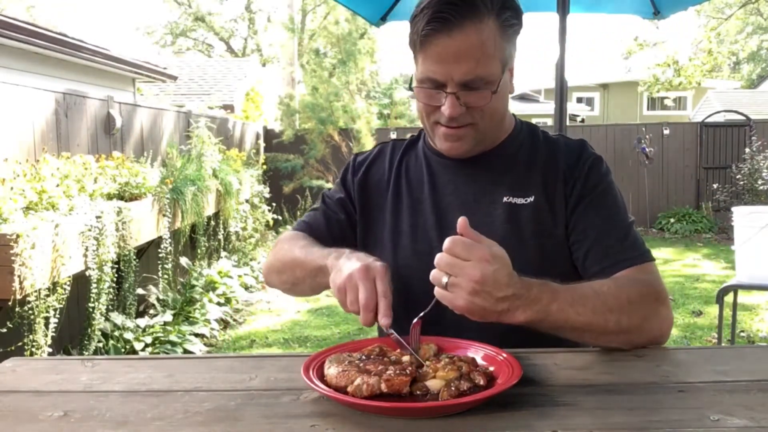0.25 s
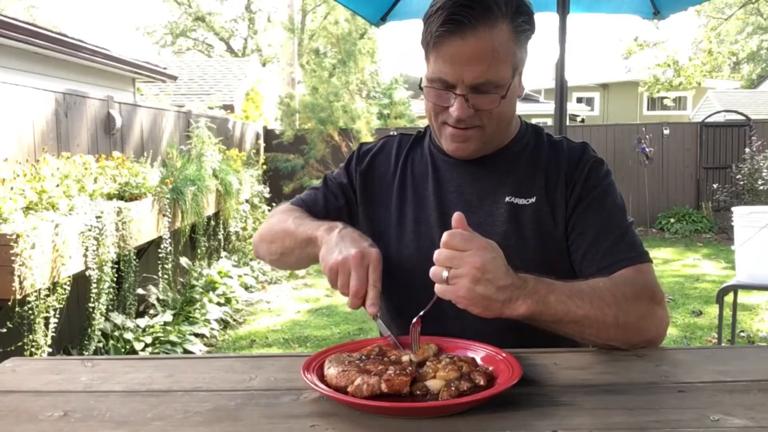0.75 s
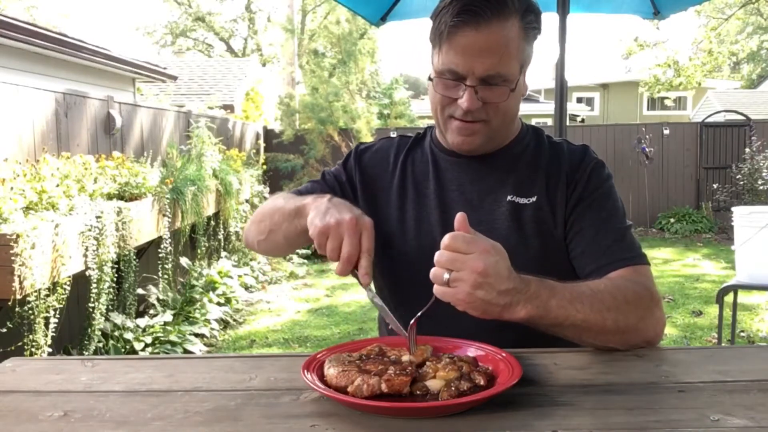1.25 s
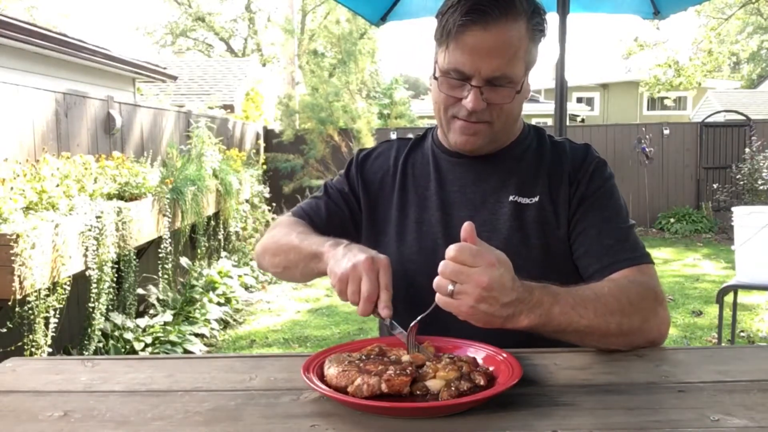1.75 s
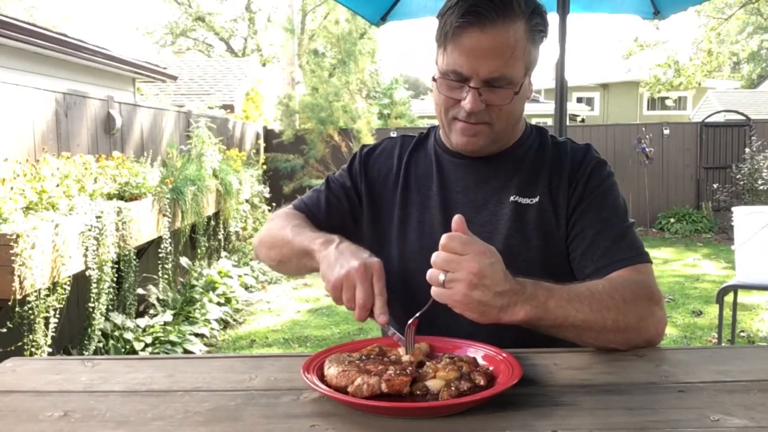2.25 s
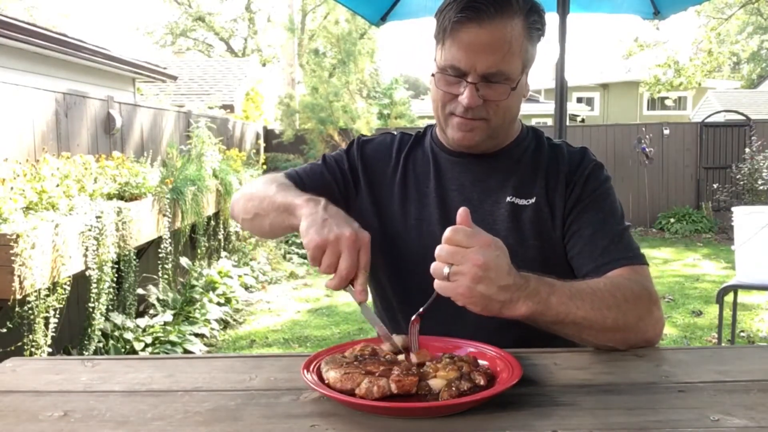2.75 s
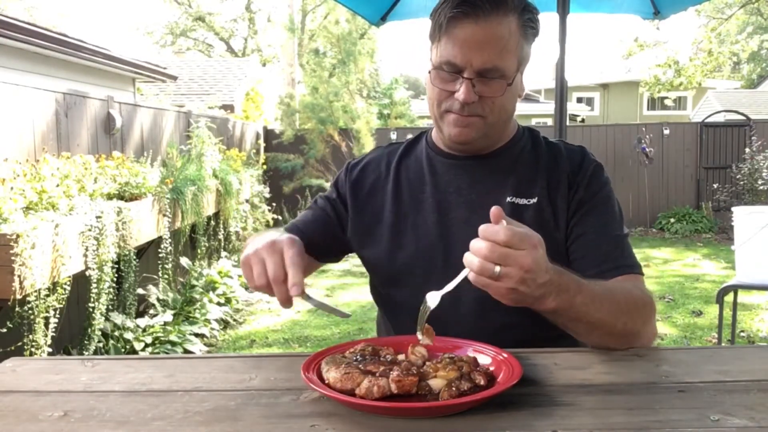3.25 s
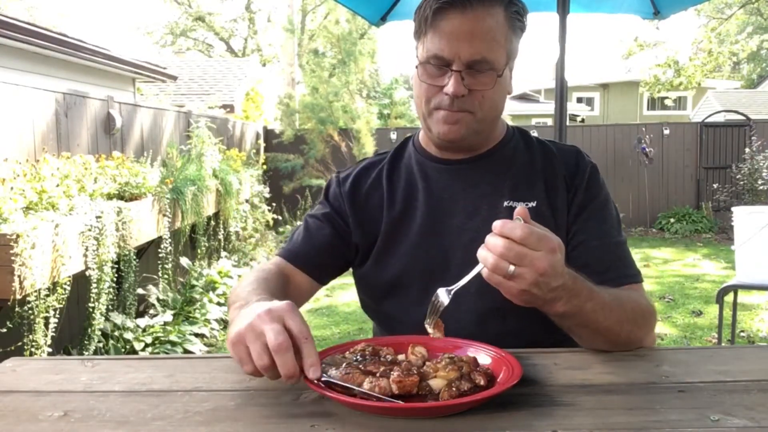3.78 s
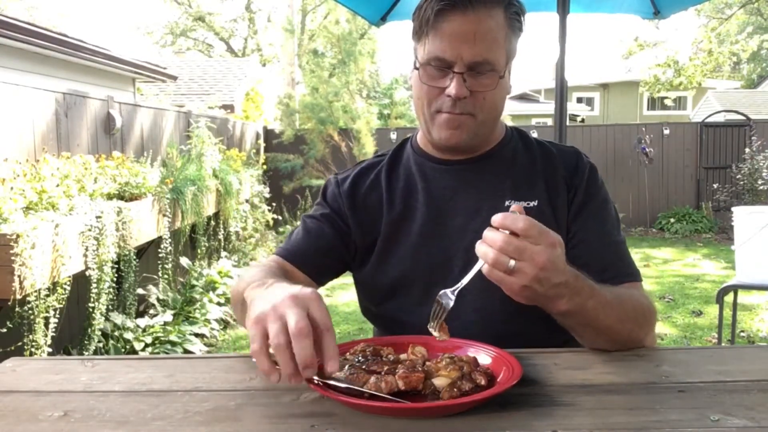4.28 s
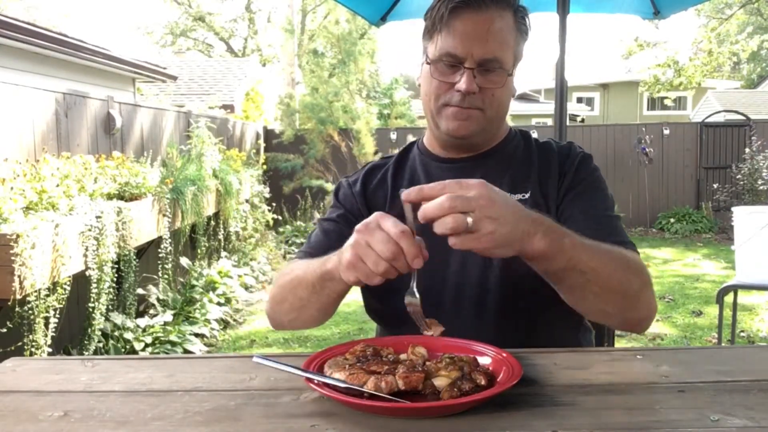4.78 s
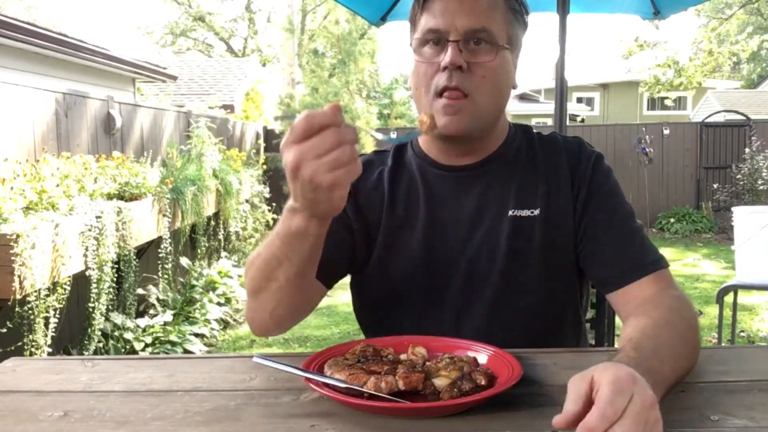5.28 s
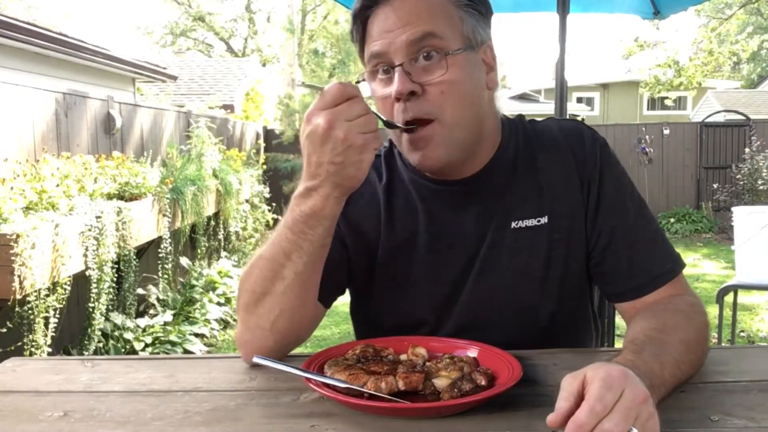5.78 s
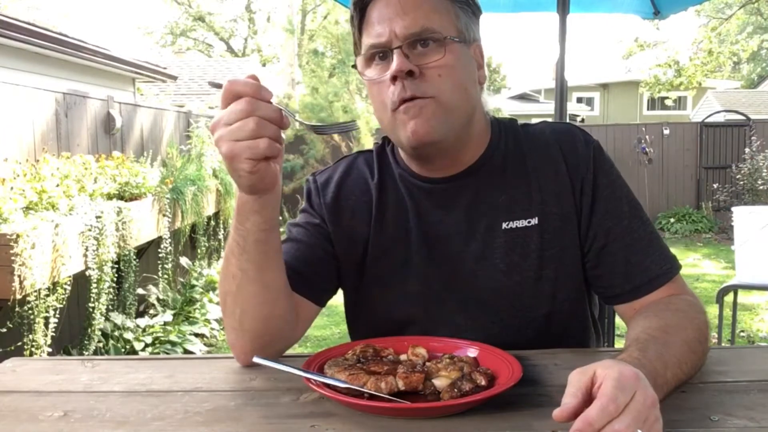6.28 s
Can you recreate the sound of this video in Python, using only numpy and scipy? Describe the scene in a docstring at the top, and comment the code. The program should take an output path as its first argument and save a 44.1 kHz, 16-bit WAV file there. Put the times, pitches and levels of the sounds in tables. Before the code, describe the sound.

A steel knife and fork work on a glazed plate on a wooden garden table, about a metre away, over a steady low town hum and very faint insect hiss. The fork ticks dully and the blade rasps softly through meat. A sharp clink rings the plate at 0.5 seconds, followed by a juddering scrape from 0.8 to 1 second. Small ticks and a tiny squeak come around 1.5 seconds. Another clink lands at 2.1, then a chattering scrape leads to a short, falling squeak at 2.6. From 3.5 to 4.3 seconds the knife is laid on the rim and nudged, with several clinks and light wooden knocks. Hands brush the wood faintly near 4.4 and 5.1 seconds, with a soft knock and two faint ticks. From about 6.1 seconds, far brakes give a thin, high squeal.

```python
"""A steel knife and fork work on a glazed plate on a wooden garden table, a metre away.
Blows and stick-slip judder ring the plate, the steel and the planks; the edge squeaks on the glaze.
The blade saws through meat, the fork ticks, hands brush the wood, the knife is laid on the rim.
Behind it: a low town hum, thin insect hiss and, at the end, a far squeal of brakes."""
import sys
import numpy as np
from scipy import signal
from scipy.fft import rfft, irfft
from scipy.io import wavfile
from scipy.ndimage import uniform_filter1d

SR = 44100
rng = np.random.default_rng(int(sys.argv[2]) if len(sys.argv) > 2 else 0)


def int16_out(signal):
    """Quantize to a 16-bit WAV file."""
    q = np.round(np.clip(np.atleast_2d(signal).T, -1, 1) * 32767)
    wavfile.write(sys.argv[1], SR, q.astype(np.int16))


N = 287973
TIME_S = np.arange(N) / SR
SILENT_DB = -120.0
GRIP_BELOW_HZ = 4000  # the hand damps bending modes below this


def undb(db):
    return 10 ** (np.asarray(db) / 20)


def unit_rms(x):
    return x / np.sqrt(np.mean(x ** 2))


def band(x, lo_hz, hi_hz):
    return signal.sosfilt(signal.butter(2, [lo_hz, hi_hz], "band", fs=SR, output="sos"), x)


def curve(segments, rest=SILENT_DB):
    """Lines through each segment's (time_s, value) points; rest elsewhere."""
    out = np.full(N, rest)
    for points in segments:
        time_s, values = np.array(points).T
        inside = (TIME_S >= time_s[0]) & (TIME_S <= time_s[-1])
        out[inside] = np.interp(TIME_S[inside], time_s, values)
    return out


def swells(strokes, depth_db):
    """Level in dB of strokes that rise to a peak and fall away."""
    return curve([[(start_s, db - depth_db), (peak_s, db), (end_s, db - depth_db)]
                  for start_s, peak_s, end_s, db, *_ in strokes])


def walk(rate_hz):
    """Random held levels, smoothed twice."""
    hold = int(SR / rate_hz)
    steps = np.repeat(rng.standard_normal(N // hold + 1), hold)
    return 1.9 * uniform_filter1d(uniform_filter1d(steps, hold), hold)[:N]


def mode(x, hz, t60_s):
    """One decaying resonance; a unit impulse rings at amplitude 1."""
    r, w = np.exp(-np.log(1000) / (t60_s * SR)), 2 * np.pi * hz / SR
    return signal.lfilter([0, r * np.sin(w)], [1, -2 * r * np.cos(w), r * r], x)


def judder(rate_hz, spread_db, grit):
    """Stick-slip: uneven slips of uneven size over fine grit."""
    slips = (rng.random(N) < rate_hz / SR) * undb(spread_db * rng.standard_normal(N))
    slips *= np.sign(rng.standard_normal(N))
    return unit_rms(unit_rms(slips) + grit * rng.standard_normal(N))


def town_hum(level_db=-38.5):
    """Low noise in octave bands that swell together and flicker alone."""
    # hum spectrum: freq_hz, relative_db
    spectrum = [(15, -39.5), (25, -18), (97, 1.5), (138, -8), (220, -8), (273, -18.5), (304, -12),
                (330, -19.5), (358, -21), (617, -27.5), (669, -29), (1030, -30.5), (8370, -48),
                (15200, -54), (16500, -89)]
    # swell of the lowest bands: time_s, relative_db
    bass_swell = [(0.0, -43.5), (1.11, -40), (1.42, -47), (2.69, -39), (2.98, -44), (3.84, -40),
                  (6.53, -47)]
    hz = np.fft.rfftfreq(N, 1 / SR)
    knot_hz, knot_db = np.array(spectrum).T
    noise = rfft(rng.standard_normal(N)) * undb(np.interp(np.log(hz + 1), np.log(knot_hz), knot_db))
    swell_db = 0.5 * walk(0.46)
    bass_db = curve([bass_swell])
    bass_db -= np.mean(bass_db)
    edges_hz = np.geomspace(20, 20000, 11)
    hum = np.zeros(N)
    for lo_hz, hi_hz in zip(edges_hz, edges_hz[1:]):
        octave = irfft(noise * (hz >= lo_hz) * (hz < hi_hz), N)
        hum += octave * undb(swell_db + 0.3 * walk(4.32) + (hi_hz < 200) * bass_db)
    return unit_rms(hum) * undb(level_db)


def insects():
    """Thin, wavering bands of hiss."""
    # insect bands: centre_hz, width_hz, level_db
    bands = [(4850, 20, -77), (8680, 800, -75)]
    out = np.zeros(N)
    for hz, width_hz, db in bands:
        hiss = band(rng.standard_normal(N), hz - width_hz / 2, hz + width_hz / 2)
        out += unit_rms(hiss) * undb(db + walk(4.0))
    return out


def brakes(fade_s=0.06):
    """Far squeal: narrow, fluttering resonances driven by noise."""
    # brake tones: pitch_hz, start_s, end_s, level_db
    squeals = [(5290, 6.19, 6.56, -62.5), (9320, 6.33, 6.7, -65), (10400, 6.31, 6.7, -72),
               (7440, 6.45, 8.4, -56), (8800, 6.09, 6.25, -73)]
    out = np.zeros(N)
    for hz, start_s, end_s, db in squeals:
        gate = np.clip(np.minimum(TIME_S - start_s, end_s - TIME_S) / fade_s, 0, 1)
        out += gate * undb(db + 1.7 * walk(50)) * unit_rms(mode(rng.standard_normal(N), hz, 0.079))
    return out


def wall_echo(x, t60_s=0.22, level_db=-14.5, delay_s=0.008):
    """Fences and walls send back a short, dull scatter."""
    t = TIME_S[:SR // 2]
    response = band(rng.standard_normal(len(t)), 148, 3850)
    response *= np.exp(-np.log(1000) * t / t60_s) * (t > delay_s)
    response *= undb(level_db) / np.sqrt(np.sum(response ** 2))
    return signal.fftconvolve(x, response)[:N]


def hands():
    """Skin and sleeves brush the wood."""
    # brush strokes: start_s, peak_s, end_s, level_db
    strokes = [(2.98, 3.12, 3.37, -56.5), (4.35, 4.44, 4.46, -51.5), (5.06, 5.115, 5.21, -46.5)]
    friction = unit_rms(band(judder(1500, spread_db=5, grit=1.7), 810, 11800))
    return friction * undb(swells(strokes, depth_db=16.5) + 2.2 * walk(60))


def sawing():
    """The blade in the meat: a soft, wet rasp."""
    # rasp envelope: time_s, level_db
    envelope = [(0, -66), (.75, -55), (1.2, -73), (1.7, -66), (1.9, -62), (2.2, -58), (3.0, -68.5),
                (4.2, -62)]
    rasp = unit_rms(band(judder(900, spread_db=1.8, grit=1.0), 730, 6400))
    return rasp * undb(curve([envelope]) + 0.79 * walk(5.5))


def dull_ticks():
    """Short, rough pushes ring damped tine modes."""
    # tines catching in the meat, then two faint ticks near the end: start_s, force_db, decay_ms
    ticks = [(0.2832, -25.5, 11.5), (0.4227, -45, 1.2), (0.814, -34, 1.5), (1.2024, -44, 1.2),
             (1.646, -46, 2), (1.791, -42, 1.3), (1.9061, -29, 11.4), (1.9912, -39, 3.3),
             (5.2004, -43.5, 1.4), (5.351, -46, 1.5)]
    # damped tine modes: freq_hz, gain_db, t60_s
    modes = [(1060, -0.5, 0.012), (3110, 2, 0.0077), (5775, -4, 0.019), (8320, -12.5, 0.012),
             (11000, -19, 0.041)]
    force, size = np.zeros(N), 2400
    for start_s, db, decay_ms in ticks:
        at = int(start_s * SR)
        decay = np.exp(-1000 * TIME_S[:size] / decay_ms)
        force[at:at + size] += undb(db) * rng.standard_normal(size) * decay
    ringing = sum(undb(db) * mode(force, hz, t60_s) for hz, db, t60_s in modes)
    return undb(-21) * ringing + undb(-11) * band(force, 1230, 8000)


def edge_squeak():
    """The edge slips in a slowing rhythm: a rough tone of three harmonics."""
    # squeaks: start_s, peak_s, end_s, level_db, first_hz, last_hz
    squeaks = [(1.498, 1.503, 1.526, -35, 1216, 1176), (2.614, 2.63, 2.65, -17, 1468, 689.5)]
    glides = [[(start_s, first_hz), (end_s, last_hz)]
              for start_s, _, end_s, _, first_hz, last_hz in squeaks]
    rate_hz = curve(glides, rest=1000.0) * (1 + 0.04 * walk(400))
    phase = 2 * np.pi * np.cumsum(rate_hz) / SR
    tone = np.sin(phase) + undb(0.5) * np.sin(2 * phase) + undb(-4) * np.sin(3 * phase)
    return tone * undb(swells(squeaks, depth_db=15) + 3.5 * walk(700))


def blade_drag():
    """The blade judders over the glaze: slip signal, pressure in dB, knife drive in dB."""
    # drags: start_s, peak_s, end_s, pressure_db, knife_share_db
    drags = [(0.868, 0.949, 0.98, -16.5, -22), (2.324, 2.375, 2.57, -31, -15),
             (2.604, 2.62, 2.724, -20, -24)]
    knife_drags = [(*times_s, db + share_db) for *times_s, db, share_db in drags]
    slip = judder(500, spread_db=6, grit=0.33)
    return slip, swells(drags, depth_db=27), swells(knife_drags, depth_db=27)


def contacts():
    """Blows on plate and table. Levels are drives; each pitch is the one the struck spot favours.
    Rows: start_s, plate_db, plate_hz, knife_db, knife_hz, grip_db, thud_db, crack_db, fork_db, contact_ms
    """
    # held blade hits, and last a soft knock of a hand on the table:
    # start_s, plate_db, plate_hz, knife_db, knife_hz
    strikes = [(0.53, -3, 1830, -13.5, 5000), (0.581, -14, 2300, -23, 4400), (2.077, -10, 2400, -11, 6040),
               (2.14, -23, 2190, -32.5, 5950), (2.202, -35, 2950, -48, 5860), (2.63, -29, 1970, -26, 5800),
               (5.079, -41, 1950, -60, 5380)]
    # blade teeth catch and skip: start_s, plate_db, knife_hz
    chatter = [(0.823, -23.5, 5700), (0.841, -20.5, 5940), (0.867, -18, 5900), (0.894, -18.5, 7190),
               (0.916, -14.5, 8750), (0.935, -23, 7140), (0.984, -23, 5670), (1.021, -26.5, 5570),
               (2.329, -25, 4450), (2.345, -21.5, 4600), (2.356, -15.5, 5500), (2.366, -16.5, 4470),
               (2.377, -13.5, 4430), (2.389, -18, 4580), (2.404, -15.5, 4610), (2.418, -16, 4470),
               (2.436, -26, 4540), (2.452, -24, 5660)]
    # knife laid down and nudged on the rim:
    # start_s, plate_db, plate_hz, knife_db, knife_hz, grip_db, thud_db, contact_ms
    setdowns = [(3.532, -60, 3400, -23, 8850, 7, -55, 17), (3.584, -18, 3300, -17.5, 7900, 41, -31, 3.3),
                (3.749, -35.5, 1220, -34, 6260, 11, -36, 14.7), (3.846, -22, 740, -36.5, 4730, 17, -19, 5),
                (3.876, -24.5, 2670, -19, 4460, 14.5, -25, 8.1),
                (4.022, -19, 3700, -19, 4860, 29, -30, 7.2), (4.224, -16, 1150, -40, 4600, 15, -23, 1.35),
                (4.231, -27, 1190, -28.5, 6480, 24, -21.5, 5.3),
                (4.297, -51, 1100, -62, 8800, 22, -32, 5.3)]
    # fork taps: start_s, fork_db
    taps = [(1.455, -29), (1.533, -43)]
    firm_grip_db, loose_grip_db = 21, 8
    rows = []
    for start_s, db, plate_hz, knife_db, knife_hz in strikes:
        thud_db = -22.5 + 0.57 * db  # grows slower than the blow
        rows.append((start_s, db, plate_hz, knife_db, knife_hz, firm_grip_db,
                     thud_db, db - 40, SILENT_DB, 0.84))
    for start_s, db, knife_hz in chatter:
        rows.append((start_s, db, 1440, db - 13.5, knife_hz, loose_grip_db,
                     -32.5, db - 40, SILENT_DB, 1.74))
    for start_s, db, plate_hz, knife_db, knife_hz, grip_db, thud_db, contact_ms in setdowns:
        rows.append((start_s, db, plate_hz, knife_db, knife_hz, grip_db,
                     thud_db, knife_db - 5.5, knife_db - 12.5, contact_ms))
    for start_s, db in taps:
        rows.append((start_s, db - 4, 1940, SILENT_DB, GRIP_BELOW_HZ, firm_grip_db,
                     SILENT_DB, db - 1.5, db, 1.3))
    return np.array(rows, float)


def place(starts_s, pieces, gains):
    """Sum of the scaled pieces, each at its start."""
    out = np.zeros(N + pieces.shape[1])
    for start_s, piece, gain in zip(starts_s, pieces, gains):
        at = int(start_s * SR)
        out[at:at + len(piece)] += gain * piece
    return out[:N]


def ring(modes, starts_s, force, drive_db, rub=0, spot_hz=1000, focus_db=0, grip_db=None):
    """Blows and rubbing ring modes; the struck spot favours one pitch, the hand damps low bending."""
    scatter_db = 2.4 * rng.standard_normal((len(force), len(modes)))
    floor = 0.34 * np.linalg.norm(force, axis=1)
    out = np.zeros(N)
    for k, (hz, mode_db, t60_s) in enumerate(modes):
        off_spot_db = focus_db * np.minimum(np.abs(np.log2(hz / spot_hz)), 1.1)
        held = grip_db is not None and hz < GRIP_BELOW_HZ
        share_db = drive_db - (grip_db if held else off_spot_db) + scatter_db[:, k]
        # even out each rough blow's strength at this mode
        strength = np.abs(force @ np.exp(2j * np.pi * hz * TIME_S[:force.shape[1]]))
        blows = place(starts_s, force, undb(share_db) / (strength + floor))
        out += (-1) ** k * undb(mode_db) * mode(blows + rub, hz, t60_s)
    return out


def cutlery():
    """Shared contacts ring plate, knife, fork and planks, with the crack and scrape of steel on glaze."""
    # modes of each body, the plate damped by food: freq_hz, gain_db, t60_s
    plate_modes = [(680, 0, 0.057), (949, -9, 0.073), (1018, -5.5, 0.073), (1208, -4.5, 0.04),
                   (1335, -8, 0.053), (1532, -1, 0.044), (1730, 3, 0.019), (1801, 1.5, 0.026),
                   (1994, -6.5, 0.042), (2310, -10, 0.022), (2462, -4, 0.047), (2686, 3, 0.02),
                   (2802, 2.5, 0.013), (3130, -1.5, 0.035), (3377, -4, 0.063), (3488, 1, 0.027),
                   (4200, -8, 0.036)]
    knife_modes = [(604, -10, 0.43), (1468, -4, 0.28), (2357, -4.5, 0.29), (3398, 5.5, 0.08),
                   (4574, -3.5, 0.066), (5810, -1.5, 0.1), (7187, -4.5, 0.12), (8760, -3.5, 0.14),
                   (10500, -11, 0.2), (11160, -26, 0.09), (12040, -7, 0.15), (13950, -10, 0.13)]
    fork_modes = [(1910, -5.5, 0.047), (3870, -11, 0.074), (4800, -1.5, 0.039), (8200, -6.5, .08),
                  (11400, -3, .05), (12600, -4, 0.15), (13900, -1.5, 0.076), (15230, -3, 0.065)]
    plank_modes = [(118, -3.5, 0.11), (220, -4, 0.09), (278.7, -0.5, 0.14), (356.6, -4.5, 0.14),
                   (540, -0.5, 0.041), (790, -16, 0.2)]
    (starts_s, plate_db, plate_hz, knife_db, knife_hz,
     grip_db, thud_db, crack_db, fork_db, contact_ms) = contacts().T
    t, contact_s = TIME_S[:6600], contact_ms[:, None] / 1000
    force = rng.standard_normal((len(starts_s), len(t))) * np.exp(-t / contact_s)
    slip, press_db, steel_db = blade_drag()
    squeak = edge_squeak()
    plate_rub = slip * undb(press_db - 33) + squeak * undb(-41)
    knife_rub = band(slip, 3300, 11700) * undb(steel_db - 24)
    plate = ring(plate_modes, starts_s, force, plate_db, plate_rub, plate_hz, focus_db=9.5)
    knife = ring(knife_modes, starts_s, force, knife_db, knife_rub, knife_hz,
                 focus_db=15.3, grip_db=grip_db)
    fork = ring(fork_modes, starts_s, force, fork_db)
    planks = ring(plank_modes, starts_s, force, thud_db, rub=slip * undb(press_db - 72))
    # countless small modes blur into a noisy tail, longer after a long contact
    tail = rng.standard_normal(force.shape) * np.exp(-t / (0.018 + 6.5 * contact_s))
    crisp = tail * np.exp(-t / 0.03)  # treble dies sooner
    crack = band(place(starts_s, crisp, undb(crack_db)), 5700, 12000)
    knife_tail = band(place(starts_s, tail, undb(knife_db - 19)), 5100, 7000)
    plate_tail = band(place(starts_s, tail, undb(plate_db - 14)), 470, 4200)
    scrape = band(slip, 1170, 3600) * undb(press_db - 0.5) + band(slip, 2800, 9200) * undb(steel_db - 1)
    return plate + knife + fork + planks + crack + knife_tail + plate_tail + scrape + squeak


def scene():
    near = cutlery() + dull_ticks() + hands() + sawing()
    return (near + wall_echo(near) + town_hum() + insects() + brakes())[None]


def record(dry):
    """46 Hz high-pass, soft clip, 15.8 kHz low-pass."""
    thin = signal.sosfilt(signal.butter(5, 46, "high", fs=SR, output="sos"), dry)
    return signal.sosfilt(signal.ellip(10, .2, 80, 15800, fs=SR, output="sos"), np.tanh(thin))


dry = scene()
out = record(dry)
int16_out(out)
```